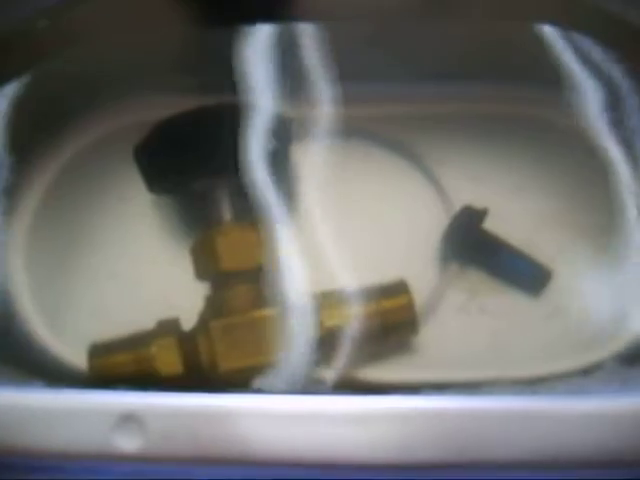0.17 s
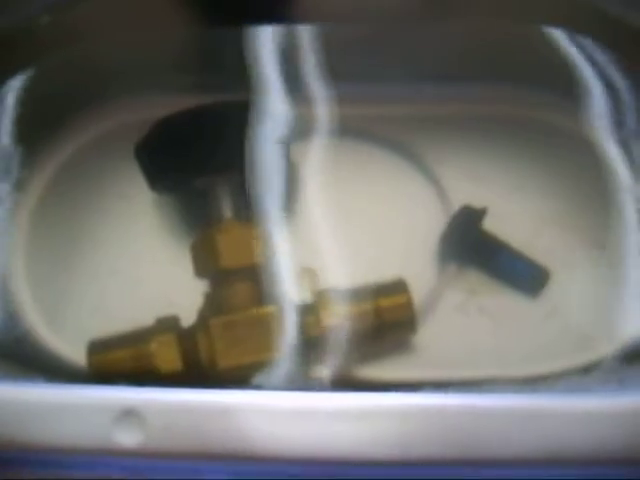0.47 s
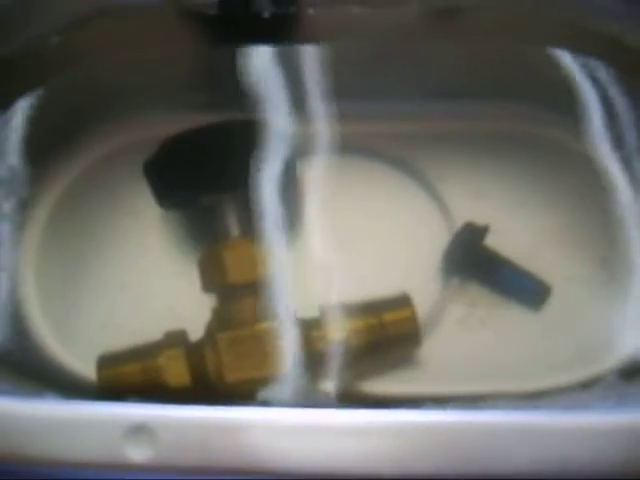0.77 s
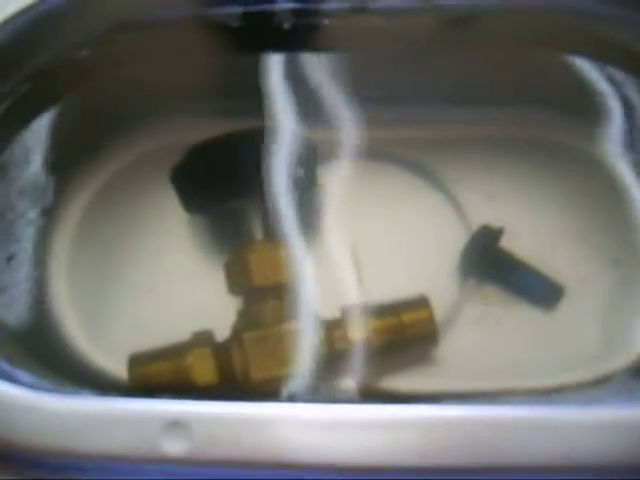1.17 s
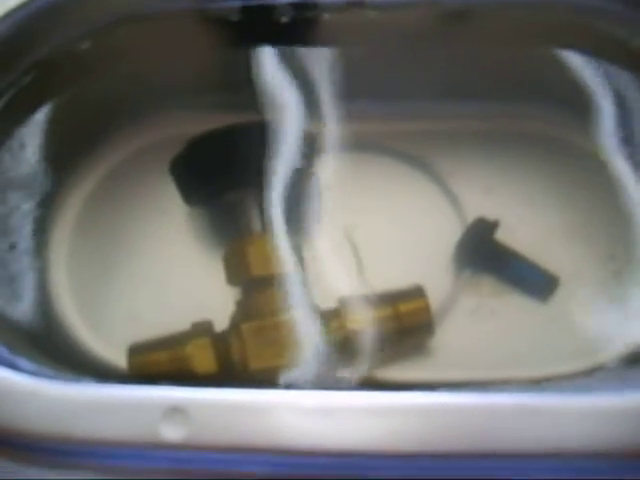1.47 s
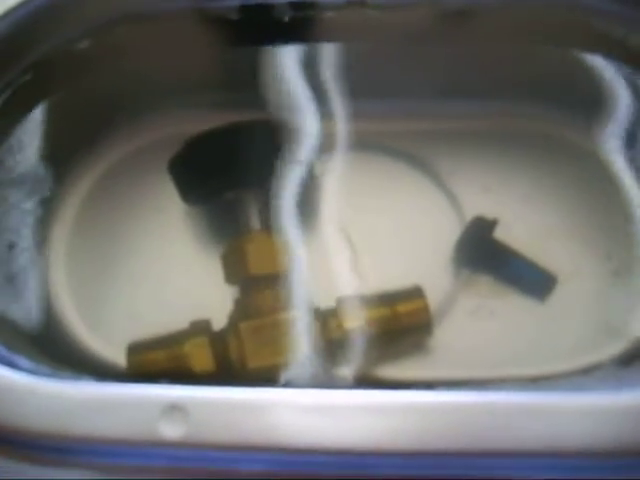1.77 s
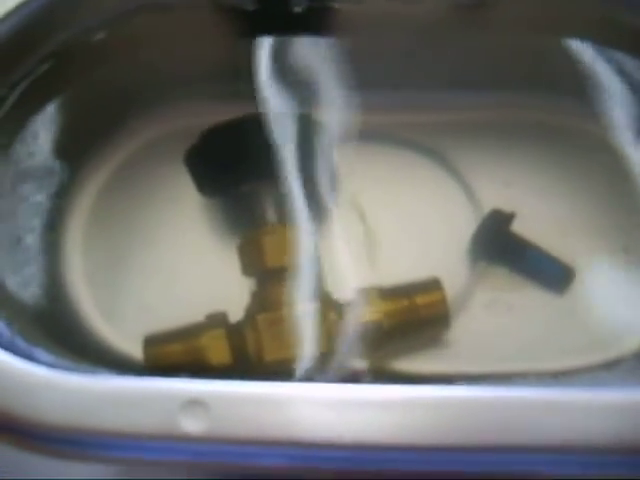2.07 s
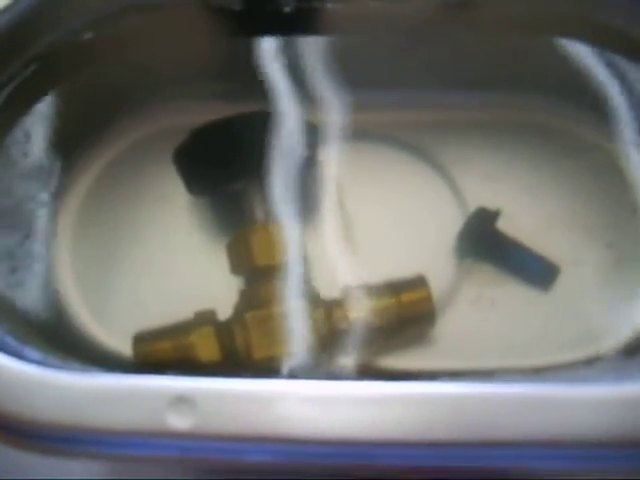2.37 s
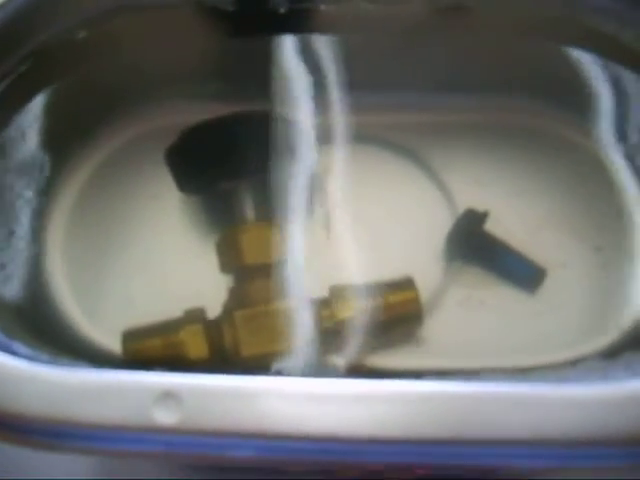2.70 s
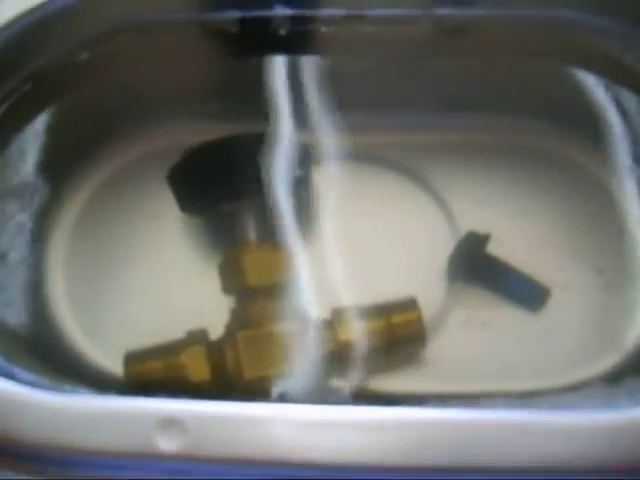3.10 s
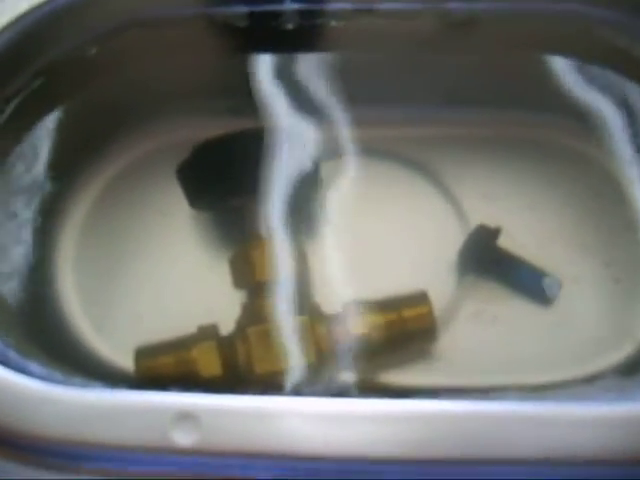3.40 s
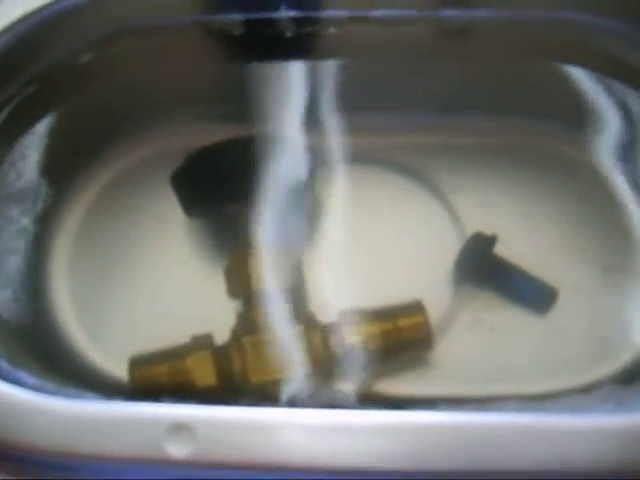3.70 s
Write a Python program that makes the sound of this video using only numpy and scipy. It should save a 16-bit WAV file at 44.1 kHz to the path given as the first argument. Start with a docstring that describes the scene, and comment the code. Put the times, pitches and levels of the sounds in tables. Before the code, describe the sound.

Close mono pickup of an ultrasonic cleaner on an indoor work surface; fizzing cavitation hiss and wavering high buzz from the steel tank continue throughout, over soft wash and hum, with a faint late knock.

```python
"""On a work surface an ultrasonic cleaning bath runs, heard close above the soapy water.
Its drive swells twice in every mains cycle, so cavitation bubbles collapse in rapid bursts: random clicks
filtered into bands of sizzling hiss, coloured by the ringing steel tank. The same pulsing makes the tank buzz
as a sum of harmonics, which waver as the water rocks. One faint knock, a low hum and a soft wash complete it."""
import sys
import numpy as np
from scipy import signal
from scipy.fft import rfft, irfft
from scipy.io import wavfile

SR = 44100
rng = np.random.default_rng(int(sys.argv[2]) if len(sys.argv) > 2 else 0)


def generate_wav(sig):
    """Save sig (samples, or channels by samples) to the path in sys.argv[1] as 16-bit PCM at SR."""
    pcm = np.round(np.clip(np.atleast_2d(sig).T, -1, 1) * 32767).astype(np.int16)
    wavfile.write(sys.argv[1], SR, pcm)


N = 169785
T = np.arange(N) / SR  # time in s
PULSE_HZ = 119.967  # drive pulses, two per mains cycle


def cavitation():
    """Bubble-collapse noise: the drive pulses modulate the tank band least and the shrill band most."""
    # Spectrum of the ringing steel tank under the collapses: frequency_hz, relative_density_db (per Hz)
    tank_spectrum = [(1500, -58.5), (3100, -35.5), (3300, -22.5), (3520, -6), (3640, -10), (3790, -2),
                     (3950, -9.5), (4170, -5), (4340, -11.5), (4570, -7.5), (4720, -15.5), (4970, -3),
                     (5120, -11), (5300, 1), (5520, -7), (5700, -3), (5950, 0), (6200, -3.5), (6500, -13),
                     (7500, -11), (10000, -42)]
    # Spectrum of the bright sizzle of the collapses: frequency_hz, relative_density_db (per Hz)
    sizzle_spectrum = [(3000, -37), (5500, -17), (6700, -0.5), (7200, 0.5), (7600, -5.5), (8050, -1.5),
                       (8350, 0), (8750, 1), (9050, -7.5), (10000, -8), (10600, -20), (12500, -41)]
    # Spectrum of sparser pops at the very top of the hiss: frequency_hz, relative_density_db (per Hz)
    pop_spectrum = [(5000, -34), (8500, -4.5), (10000, 1.5), (10550, 1), (10900, -7), (11700, -11.5),
                    (12000, -12), (12450, -26), (14000, -55)]
    # Spectrum of the shrill, most deeply pulsed band of the hiss: frequency_hz, relative_density_db (per Hz)
    shrill_spectrum = [(7500, -45), (9050, -21), (9250, -5.5), (9450, 2), (9650, -3.5), (9790, 3),
                       (9920, -9.5), (10070, 0.5), (10330, -17.5), (11500, -51)]
    # Slow swelling of each band, before its trim below: time_s, relative_level_db
    tank_swell = [(0.0, -41.5), (0.63, -40.5), (1.41, -41.5), (1.5, -42.5), (1.59, -40.5), (2.34, -43),
                  (2.49, -41), (2.79, -43), (2.88, -41), (3.09, -42), (3.72, -40.5), (3.84, -42)]
    sizzle_swell = [(0.0, -43), (0.54, -41), (0.69, -42.0), (1.32, -41.5), (1.5, -44), (1.71, -41),
                    (1.83, -44), (1.92, -42), (2.67, -44.5), (2.76, -41.5), (2.85, -45.5), (2.94, -43.0),
                    (3.63, -44.5), (3.84, -41.5)]  # shared by the pops
    shrill_swell = [(0.0, -42), (0.24, -48), (0.54, -41.5), (0.6, -44), (0.69, -41.5), (0.78, -45.5),
                    (1.2, -39), (1.26, -44.5), (1.35, -39.5), (1.86, -43.5), (1.92, -40), (2.31, -46.0),
                    (2.34, -51), (2.46, -45.5), (2.52, -49.5), (2.79, -42), (3.15, -43.0), (3.24, -52),
                    (3.33, -44), (3.39, -52), (3.45, -47.5), (3.84, -45.5)]
    tank_trim_db, sizzle_trim_db, pop_trim_db, shrill_trim_db = -1.87, 0.62, -8, -0.5
    flutter_hz = 13.3

    # The tank band varies on its own; the three upper bands vary together.
    bursts, tank_bursts = rng.standard_normal((2, N))
    flutter, tank_flutter = wander(flutter_hz), wander(flutter_hz)

    tank = collapses(tank_bursts, tank_flutter, per_s=22000, spread_db=2.0, dip_db=2.4,
                     lag=-0.25, burst_db=0.5, flutter_db=0.56)
    sizzle = collapses(bursts, flutter, per_s=26000, spread_db=1.2, dip_db=7.5,
                       lag=0.087, burst_db=1.08, flutter_db=0.38)
    pops = collapses(bursts, flutter, per_s=8000, spread_db=3.0, dip_db=10,
                     lag=0.098, burst_db=0.6, flutter_db=1.1)
    shrill = collapses(bursts, flutter, per_s=20000, spread_db=1.4, dip_db=20,
                       lag=0.069, burst_db=2.0, flutter_db=1.0)

    tank_hiss = amp(tank_trim_db) * level(tank_swell) * colour(tank, tank_spectrum)
    bright = amp(sizzle_trim_db) * colour(sizzle, sizzle_spectrum)
    bright += amp(pop_trim_db) * colour(pops, pop_spectrum)
    shrill_hiss = amp(shrill_trim_db) * level(shrill_swell) * colour(shrill, shrill_spectrum)
    return tank_hiss + level(sizzle_swell) * bright + shrill_hiss


def collapses(bursts, flutter, per_s, spread_db, dip_db, lag, burst_db, flutter_db):
    """Modulated shot noise: random clicks die down between drive pulses, and burst strengths vary."""
    turns = T * PULSE_HZ - lag  # lag is a fraction of one pulse
    clicks = (rng.random(N) < per_s / SR) * rng.choice([-1, 1], N)
    size_db = spread_db * np.minimum(rng.exponential(1, N), 5)
    pause = np.cos(np.pi * turns) ** 4  # 1 between pulses, 0 at mid-pulse
    burst = bursts[np.floor(turns).astype(int)]  # one strength per pulse
    return clicks * amp(size_db - dip_db * pause + burst_db * burst + flutter_db * flutter)


def buzz():
    """Harmonic series of a periodic force: the pulses drive the tank at multiples of their rate."""
    # Partials of the tank: multiple of the pulse rate, relative_level_db
    partials = [(2, -76), (3, -59), (4, -66), (7, -78), (8, -67), (9, -70), (11, -73), (12, -74), (13, -72),
                (14, -72), (15, -77), (17, -57), (18, -64), (19, -71), (20, -71), (23, -74), (24, -71),
                (28, -69), (29, -75), (30, -55), (31, -62), (32, -69), (33, -73), (34, -64), (35, -61),
                (36, -64), (37, -76), (38, -63), (39, -63), (40, -63), (41, -64), (42, -57), (43, -66),
                (44, -63), (45, -60), (46, -77), (47, -64), (48, -54), (49, -53), (50, -57), (51, -67),
                (52, -63), (53, -63), (54, -68), (55, -65)]
    # Depth of the waver across the spectrum: frequency_hz, waver_db
    waver_depth = [(360, 1.7), (960, 2.4), (2040, 1.4), (3600, 1), (4200, 1.5), (5900, 2.5)]
    # Swell of the high partials: time_s, gain_db
    whine_swell = [(0, 1.2), (1, 1), (1.5, -0.55), (3.85, 0)]
    # Swell of the low drone, the third multiple: time_s, gain_db
    drone_swell = [(0, -2.5), (.72, 3), (.96, -1.5), (1.5, 2), (1.59, -7), (1.71, 3.5), (1.89, 0),
                   (2.19, 2.5), (2.31, -4), (2.45, 1.5), (3.38, 0), (3.48, 5), (3.56, -.5), (3.85, -1.5)]
    # Slow growth of the 2 kHz whistle: time_s, gain_db
    whistle_swell = [(0, -1.5), (1.2, -0.5), (3.85, 1)]
    # A ringing partial near 4.2 kHz that dies down early: time_s, gain_db
    ring_swell = [(0, 6), (.5, 5.5), (1.3, 0), (1.9, -2), (2.7, 0), (3.85, 1)]
    trim_db, whine_above_hz = 0.5, 3300

    own_swell = {3: drone_swell, 17: whistle_swell, 35: ring_swell}
    whine_gain = level(whine_swell)
    out = np.zeros(N)
    for multiple, db in partials:
        hz = multiple * PULSE_HZ
        if multiple in own_swell:
            swell = level(own_swell[multiple])
        elif hz > whine_above_hz:
            swell = whine_gain
        else:
            swell = 1
        waver_db = np.interp(hz, *np.transpose(waver_depth))
        out += swell * tone(hz, db, waver_db, drift_rad=0.18)
    return amp(trim_db) * out


def tone(hz, db, waver_db, drift_rad):
    """Random amplitude and phase modulation: a sine of given rms level that wavers in both."""
    waver_hz = 6.2
    phase = 2 * np.pi * (hz * T + rng.random()) + drift_rad * wander(waver_hz)
    waver = unit(amp(waver_db * wander(waver_hz)))
    return np.sqrt(2) * amp(db) * waver * np.sin(phase)


def tick():
    """Exponential decay of an impact: a short dull knock of filtered noise in the tank."""
    # The knock: start_s, level_db, t60_s (time to fall by 60 dB)
    start_s, level_db, t60_s = (3.037, -42, .045)
    # Spectrum of the knock: frequency_hz, relative_density_db (per Hz)
    knock_spectrum = [(150, -26), (350, -5), (900, -5), (1300, -10), (1600, 1), (1950, 1), (2400, -22)]
    age_s = np.maximum(T - start_s, 0)
    decay = (T > start_s) * amp(level_db - 60 * age_s / t60_s)
    return decay * colour(rng.standard_normal(N), knock_spectrum)


def hum():
    """Additive synthesis: a separate low hum is a sum of slightly wavering sines."""
    # Partials of the hum: frequency_hz, level_db
    hum_partials = [(57, -83), (78, -82), (97, -76.5), (118.2, -64.5)]
    return sum(tone(hz, db, waver_db=0.6, drift_rad=0.1) for hz, db in hum_partials)


def wash():
    """Filtered broadband noise: the soft wash of water, casing and room."""
    # Spectrum of the wash: frequency_hz, relative_density_db (per Hz)
    wash_spectrum = [(20, -39), (55, -21), (100, -19.5), (160, -4.5), (210, -5), (280, -4.5), (360, -2.5),
                     (430, -7.5), (600, -8), (800, -7), (970, -5.5), (1100, -9.5), (1250, -12), (1400, -12),
                     (1540, -1), (1700, -11.5), (1950, -12.5), (2080, -7), (2350, -14.5), (2560, -8.5),
                     (2720, -14), (2860, -9), (2960, -16), (3200, -12.5), (4000, -20.5), (8000, -58)]
    level_db = -54.5
    return amp(level_db) * colour(rng.standard_normal(N), wash_spectrum)


def amp(db):
    """Logarithmic level: decibels to amplitude gain."""
    return 10 ** (np.asarray(db) / 20)


def unit(x):
    """Mean-square normalisation to rms 1."""
    return x / np.sqrt(np.mean(x ** 2) + 1e-20)


def level(curve):
    """Amplitude envelope: gain over time, linear in dB between (time_s, level_db) points."""
    return amp(np.interp(T, *np.transpose(curve)))


def colour(x, points, size=16384):
    """Minimum-phase filtering: a causal ring with the given spectrum, output scaled to rms 1."""
    hz, db = np.transpose(points)
    order = np.argsort(hz)
    log_hz = np.log(abs(np.fft.fftfreq(size, 1 / SR)) + 1)
    log_gain = np.log(amp(np.interp(log_hz, np.log(hz[order]), db[order])))
    # The Hilbert transform of the log gain gives the minimum phase.
    response = np.exp(np.conj(signal.hilbert(log_gain)))
    ring = np.fft.ifft(response).real[:size // 2]
    led_in = np.concatenate([x[-size:], x])  # the filter already rings at the start
    return unit(signal.fftconvolve(led_in, ring)[size:size + N])


def wander(hz, size=2048):
    """Band-limited random motion: noise of rms about 1, weakened below 1 Hz and above about hz."""
    span_s = 2 * N / SR
    f = np.fft.rfftfreq(size, span_s / size)
    weight = f / (f + 1) * np.exp(-(f / hz) ** 2)
    slow = irfft(rfft(rng.standard_normal(size)) * weight)
    return np.interp(T, np.linspace(0, span_s, size), unit(slow))


def scene():
    """Superposition: the sources add linearly into one channel."""
    return (cavitation() + buzz() + tick() + hum() + wash())[None]


def record(dry):
    """Band limitation: a linear-phase low-pass removes the extreme treble."""
    cut_hz = 12480
    low_pass = signal.firwin(511, cut_hz, window=("kaiser", 9), fs=SR)
    return signal.oaconvolve(dry, low_pass[None], "same")


dry = scene()
out = record(dry)
generate_wav(out)
```